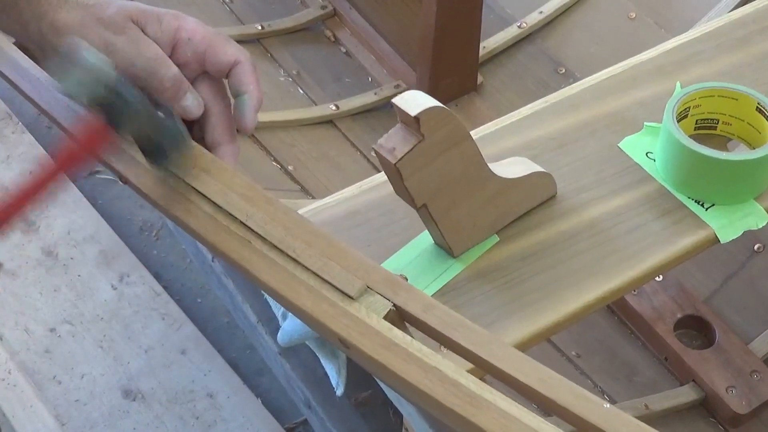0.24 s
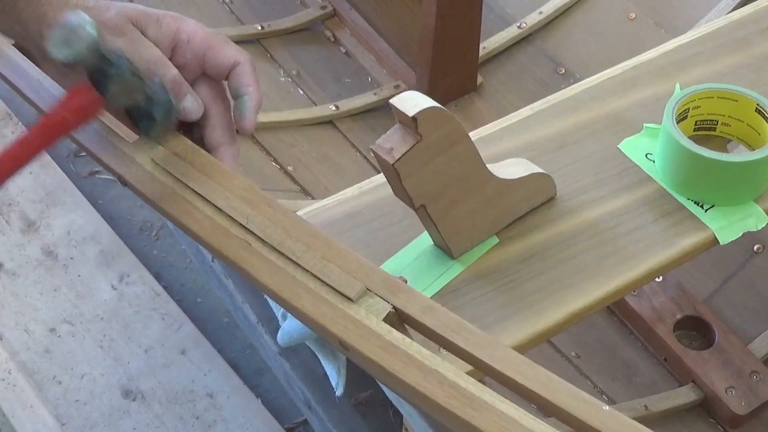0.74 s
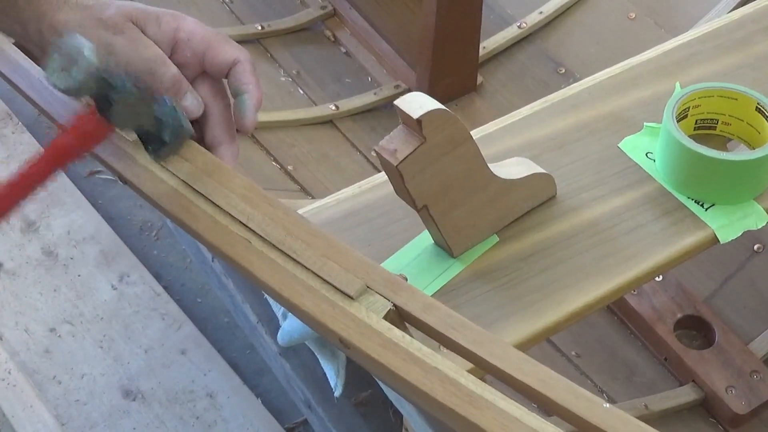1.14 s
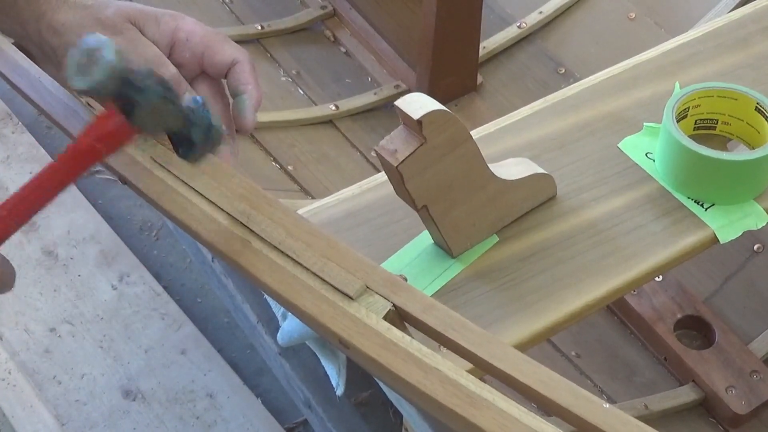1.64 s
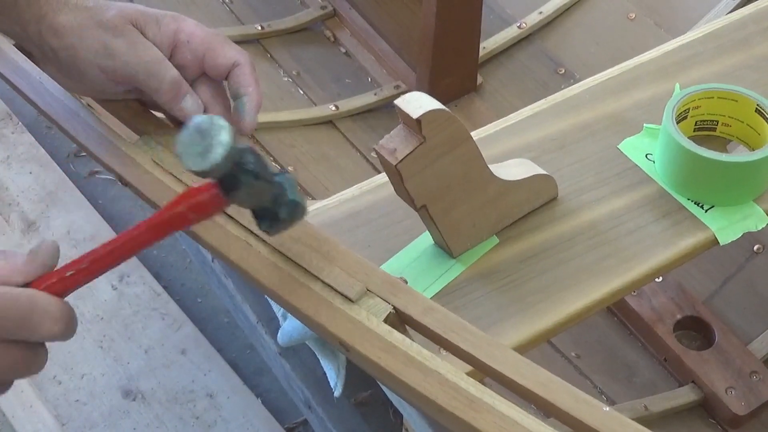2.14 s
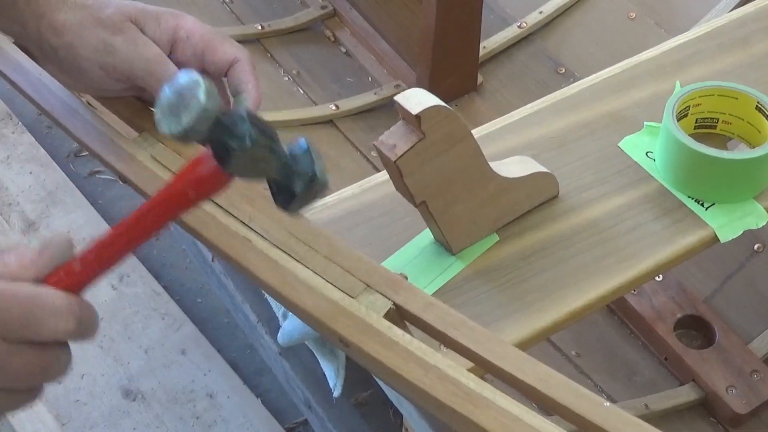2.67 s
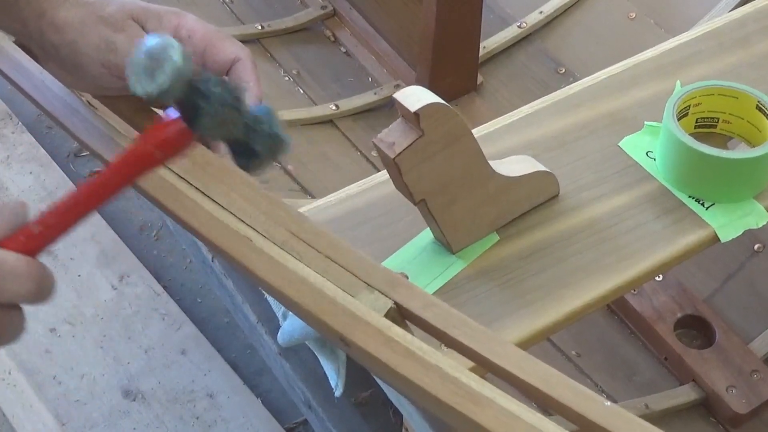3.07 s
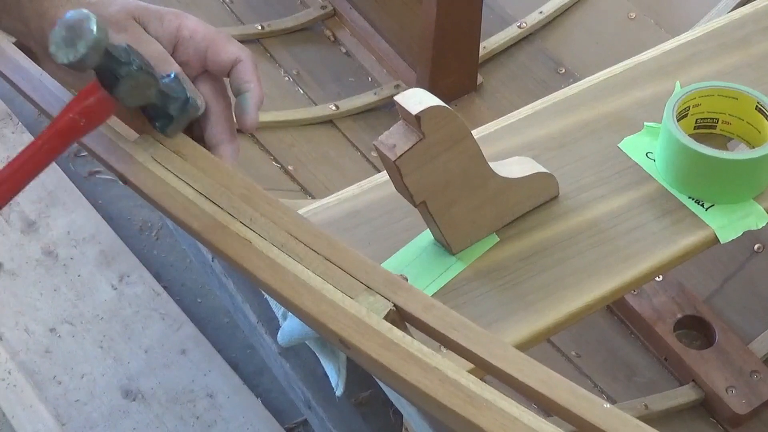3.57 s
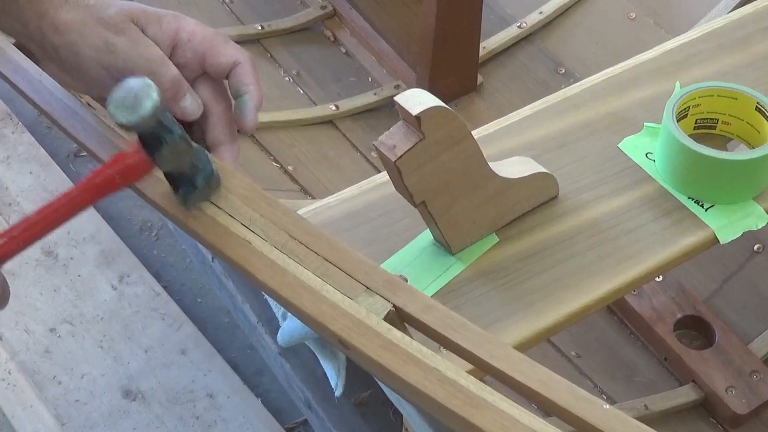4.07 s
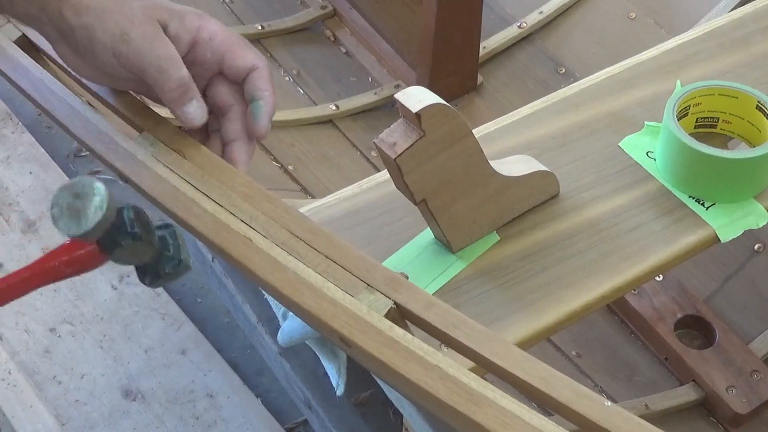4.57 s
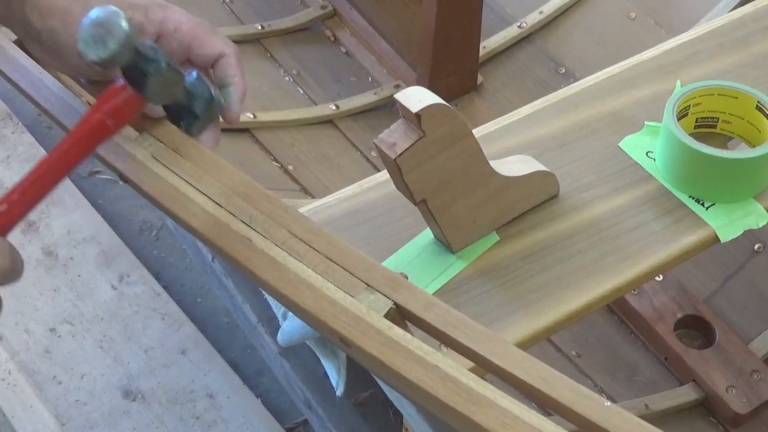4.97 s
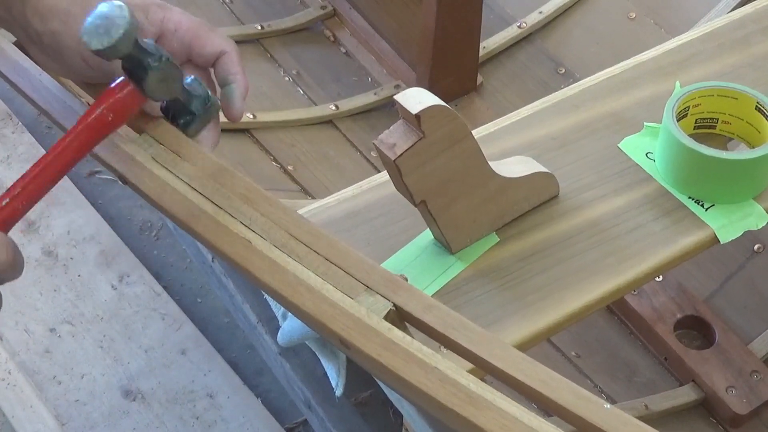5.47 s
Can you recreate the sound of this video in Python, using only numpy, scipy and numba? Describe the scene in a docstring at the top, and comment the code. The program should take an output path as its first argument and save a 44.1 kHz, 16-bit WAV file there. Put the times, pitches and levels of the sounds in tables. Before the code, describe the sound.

A steel hammer raps a wooden block on a boat rail about three times a second, each hard knock ringing through the hollow hull.

```python
"""In a boat workshop, a steel hammer taps a glued wooden block into the rail of a wooden boat.
Blows come about three a second, with a few pauses. Each is a short noise crack of steel on wood and a
woody tock of fading sines; the hull rings as longer sines and fading noise, for about half a second.
Blows differ in force, sharpness of contact, hollowness of the struck spot and looseness of the block.
Soft noise and a faint hum fill the pauses; the camera's limiter holds down the loud peaks."""
import sys
import numpy as np
from scipy import signal
from scipy.fft import rfft, irfft, next_fast_len
from scipy.io import wavfile
from scipy.ndimage import map_coordinates
from numba import njit

SR = 44100
rng = np.random.default_rng(int(sys.argv[2]) if len(sys.argv) > 2 else 0)


def store_pcm(level_fs):
    """Save levels as 16-bit WAV."""
    pcm = np.round(np.clip(level_fs, -1, 1) * 32767).astype(np.int16)
    wavfile.write(sys.argv[1], SR, np.atleast_2d(pcm).T)


N = 251811  # length in samples

# strongest resonances of the hull in the workshop:
# (frequency [Hz], relative level [dB], time to fade by 60 dB [s])
HULL_MODES = [(85, -21.5, 0.7), (99.4, -15.5, 0.41), (113.3, -13, 0.47), (134, -7, 0.35), (158.5, -2, 0.38),
              (170, -8.5, 0.42), (186.8, -6, 0.36), (197.5, -7.5, 0.45), (212, -3.0, 0.44),
              (243.9, -5.5, 0.42), (261.2, -6.5, 0.44), (282.3, -9, 0.45), (321.7, -0.5, 0.46),
              (330.7, -6, 0.36), (361, -8, 0.35), (386, -5.0, 0.39), (433.4, -3.5, 0.39),
              (480.6, -12.5, 0.31), (520, -9.5, 0.35), (555, -6.5, 0.22), (623, -5, 0.29), (677.3, -7, 0.3),
              (780, -6.5, 0.36), (882, -14.5, 0.4), (1052.3, -14, 0.38), (1227, -15.5, 0.25),
              (1352, -9.5, 0.22), (3027.6, -19.5, 0.37), (3316, -22.5, 0.37)]
# colour of the dense ring between those resonances: (frequency [Hz], relative level [dB per Hz])
RING_COLOUR = [(25, -34.5), (55, -29), (100, -11.5), (170, -0.5), (340, 0.5), (500, -1.5), (700, -3),
               (1050, -8), (1400, -8.5), (2200, -14.5), (4600, -20.5), (5900, -17), (7500, -25.5),
               (11000, -33), (13000, -70)]


def amp(db):
    """Turn decibels into a gain."""
    return 10 ** (np.asarray(db) / 20)


def unit(x):
    """Scale to an rms (average strength) of 1."""
    return x / np.sqrt(np.mean(x ** 2) + 1e-20)


def along(points, hz):
    """Read a curve of (frequency, value) points on a logarithmic frequency axis."""
    point_hz, value = np.transpose(points)
    return np.interp(np.log(hz + 1), np.log(point_hz + 1), value)


def filtered(x, response):
    """Multiply each frequency of x by the gain that response gives for it."""
    size = x.shape[-1]
    padded = next_fast_len(size + 4096)  # room for the filter's tail
    spectrum = rfft(x, padded) * response(np.fft.rfftfreq(padded, 1 / SR))
    return irfft(spectrum, padded)[..., :size]


def noise(colour, size):
    """Coloured stereo noise of rms 1: a part both microphones share, plus a weaker part that differs."""
    # the differing part against the shared one: (frequency [Hz], level [dB])
    side_level = [(30, -4.5), (120, -23.5), (500, -19.5), (2000, -16.5), (10000, -12.5)]
    mid, side = filtered(rng.standard_normal((2, size)), lambda hz: amp(along(colour, hz)))
    side = filtered(side, lambda hz: amp(along(side_level, hz)))
    return unit(np.array([mid + side, mid - side]))


def bell(hz, centre_hz, octaves):
    """A smooth hump of height 1 on a logarithmic frequency axis."""
    return np.exp(-.5 * (np.log2((hz + 1) / centre_hz) / octaves) ** 2)


def blow_colour(hz, sharpness, hollow_db, rattle_db):
    """A sharp contact trades thud for treble; a hollow spot adds knock, a loose block adds rattle."""
    contact_hz = 4650  # the treble tilts from about here upward
    treble = .5 * np.log2(1 + (hz / contact_hz) ** 2)
    # a dull contact pushes the planks longer: 0.22 dB of thud per dB/octave of dullness
    thud = 0.22 * bell(hz, centre_hz=350, octaves=0.48)
    knock = bell(hz, centre_hz=670, octaves=0.66)
    rattle = bell(hz, centre_hz=2930, octaves=0.54)
    return amp(sharpness * (treble - thud) + hollow_db * knock + rattle_db * rattle)


def crack_of_steel(t, crack_t60=0.0065, scatter_db=-13.0, scatter_t60=0.06):
    """The noise burst of steel on wood, then weaker scatter off the nearby boards (t60 in s)."""
    # colour of steel on wood: (frequency [Hz], relative level [dB per Hz])
    crack_colour = [(300, -22), (900, -4.5), (1600, 4.5), (3500, 3), (6200, 9), (8500, 4.5), (11000, -7.5),
                    (13000, -43)]
    crack_fade = amp(-60 * t / crack_t60)
    scatter_fade = amp(scatter_db - 60 * t / scatter_t60)
    return noise(crack_colour, len(t)) * (crack_fade + scatter_fade)


def block_tock(t, colour, scatter_db=2, detune=0.004, rise_s=0.0024):
    """Block and rail sound as brief sines; strength and pitch vary a little from blow to blow."""
    # resonances of block and rail, damped by glue and the steadying hand:
    # (frequency [Hz], relative level [dB], time to fade by 60 dB [s])
    block_modes = [(545, -2, 0.069), (787, -14.5, 0.015), (1410, -15, 0.15), (1578, -11.5, 0.22),
                   (1762, -5.5, 0.044), (1967, -11, 0.11), (2255, -4, .04), (6330, -4, 0.048)]
    hz, db, t60 = np.transpose(block_modes)[:, :, None]
    strength, shift, phase = rng.standard_normal((3, *hz.shape))
    level = colour(hz) * amp(db + scatter_db * strength - 60 * t / t60)
    wave = np.sin(2 * np.pi * (hz * (1 + detune * shift) * t + phase))
    # both microphones hear the block alike
    return np.sum(level * wave, axis=0) * (1 - np.exp(-t / rise_s))


def hull_resonances(t, phases, scatter_db=2.0, swell_s=0.012, apart_db=0.76):
    """Fading sines swell as the blow spreads through the planks; the two microphones hear them unequally."""
    hz, db, t60 = np.transpose(HULL_MODES)[:, :, None]
    level = amp(db + scatter_db * rng.standard_normal(hz.shape) - 60 * t / t60)
    wave = np.sin(2 * np.pi * hz * t + phases)
    pickup = amp(apart_db * rng.standard_normal((2, len(HULL_MODES))))
    return pickup @ (level * wave) * (1 - np.exp(-t / swell_s))


def die_away(x):
    """Let each frequency of the ring fade at its own speed."""
    # (frequency [Hz], time to fade by 60 dB [s])
    ring_t60 = [(80, 0.63), (220, 0.48), (600, 0.47), (1500, 0.42), (4000, 0.41), (7000, 0.36),
                (11000, 0.28)]
    hz, t, pieces = signal.stft(x, SR, nperseg=256)
    fade = amp(-60 * t / along(ring_t60, hz)[:, None])
    return signal.istft(pieces * fade, SR, nperseg=256)[1][:, :x.shape[-1]]


def dense_ring(t, usual, bass_hz=600, bass_swell_s=0.024, treble_swell_s=0.00044):
    """Fading noise for countless weak resonances and wall echoes, part repeated and part new each blow."""
    # how much of the ring's power is new at each blow: (frequency [Hz], share [0-1])
    renewed = [(200, .25), (900, 0.53), (2500, 0.6), (8000, 0.1)]
    fresh = filtered(noise(RING_COLOUR, len(t)), lambda hz: np.sqrt(along(renewed, hz)))
    repeated = filtered(usual, lambda hz: np.sqrt(1 - along(renewed, hz)))
    ring = die_away(fresh + repeated)
    bass = filtered(ring, lambda hz: 1 / (1 + (hz / bass_hz) ** 2))
    treble = ring - bass
    # the heavy planks take longer to get moving than the small block
    return bass * (1 - np.exp(-t / bass_swell_s)) + treble * (1 - np.exp(-t / treble_swell_s))


def striking_spot(hz, depth_db=1.0, spacing_hz=130):
    """Each spot favours some frequencies of the dense ring and misses others, more so higher up."""
    knots = rng.standard_normal(1024)
    ripple = map_coordinates(knots, [hz / spacing_hz], mode="mirror")  # a smooth random curve
    return depth_db * hz / (hz + 600) * ripple


def add(out, start_s, x):
    """Mix x into out from start_s on; what falls outside is dropped."""
    start = round(start_s * SR)
    x = x[:, max(-start, 0):N - start]
    out[:, max(start, 0):][:, :x.shape[1]] += x


def hammer(modes_db=-9.5, ring_db=-7.0, block_db=-10.0):
    """Every blow drives the same hull; its force and the way it lands set its level and colour."""
    # (time [s], force [dB], sharpness of contact [dB per octave], hollowness of the spot [dB],
    #  rattle of the block in its gap [dB])
    blows = [(-.045, 0.8, 1, -1, 1.5), (0.2977, 3, 6, 3, 7), (0.639, 1.3, 4, 2.5, 7),
             (0.9633, 1.9, 5, -1, 1), (1.2272, 4, -18.5, -6, -5), (1.4925, 3.4, -9.5, -6, -2.5),
             (1.787, 0.1, -3.5, -2.5, 4), (2.1048, 3, 5, -3.5, 0), (2.4441, 4.5, -4, 5, 0.5),
             (2.8095, 1.9, 1, 7.5, 1), (3.3426, 3, 6, 0, 0), (3.7219, -2.2, -7.5, 4.5, -3.5),
             (3.9392, -2.3, -14.5, 4, 4.5), (4.1096, -4, -18.5, 7.5, 4.5), (5.091, 6, -6, -8.5, -3.5),
             (5.3744, 4, -7, -9, -7.5), (5.6251, 3.5, -7.5, -8, -5.5)]
    crack_share = 0.86  # part of the sharpness that colours the crack
    tock_per_solidity = 0.36  # the block tocks most on a solid spot: dB gained per dB less hollowness
    brief = np.arange(round(0.12 * SR)) / SR  # time in the crack and tock
    t = np.arange(round(0.7 * SR)) / SR  # time in the ring
    out = np.zeros((2, N))
    phases = rng.uniform(0, 2 * np.pi, (len(HULL_MODES), 1))
    usual = noise(RING_COLOUR, len(t))
    for start_s, force_db, sharpness, hollow_db, rattle_db in blows:
        colour = lambda hz: blow_colour(hz, sharpness, hollow_db, rattle_db)
        crack_tint = lambda hz: blow_colour(hz, crack_share * sharpness, hollow_db, rattle_db)
        crack = filtered(crack_of_steel(brief), crack_tint)
        tock = amp(block_db - tock_per_solidity * hollow_db) * block_tock(brief, colour)
        modes = amp(modes_db) * hull_resonances(t, phases)
        wash = filtered(dense_ring(t, usual), lambda hz: amp(striking_spot(hz)))
        ring = filtered(modes + amp(ring_db) * wash, colour)
        add(out, start_s, amp(force_db) * (crack + tock))
        add(out, start_s, amp(force_db) * ring)
    return out


def workshop(air_db=-57, lean_db=1.1):
    """Still air as steady noise and a distant machine as steady sines, a little to the left."""
    # colour of the air: (frequency [Hz], relative level [dB per Hz])
    air_colour = [(18, -67), (30, -32.5), (50, -20), (63, -1.5), (120, -14.5), (160, -7.5), (270, -12.5),
                  (1490, -19.5), (1770, -20), (1950, -23.5), (3530, -28), (6230, -29.5), (11000, -42),
                  (14300, -65.5), (22000, -120)]
    # tones of the distant machine, before the lean to the left: (frequency [Hz], rms level [dB])
    hum_tones = [(66, -69.5), (157, -66.5), (210, -66.5), (1776, -74.5)]
    t = np.arange(N) / SR
    hum = np.zeros(N)
    for hz, db in hum_tones:
        hum += amp(db) * np.sqrt(2) * np.sin(2 * np.pi * (hz * t + rng.random()))
    air = amp(air_db) * noise(air_colour, N)
    return (air + hum) * amp([[lean_db / 2], [-lean_db / 2]])


def scene():
    """Mix hammer and workshop; the bass of the whole lies a little to the left."""
    # (frequency [Hz], left minus right [dB])
    left_lean = [(100, 2.5), (250, 1.3), (600, 0.5), (2000, 0), (10000, 0)]
    mix = hammer() + workshop()
    return filtered(mix, lambda hz: amp(np.outer([.5, -.5], along(left_lean, hz))))


@njit
def follow(x, attack, release):
    """Follow a level up and down with two time constants, in samples."""
    out = np.empty_like(x)
    level = 0.
    for i in range(len(x)):
        level += (x[i] - level) / (attack if x[i] > level else release)
        out[i] = level
    return out


def limiter(x, ceiling_db=-3.5, attack_s=0.000067, release_s=0.013, linger=0.2, recovery_s=0.79):
    """Pull peaks down almost at once; most of the gain returns quickly, a part of it slowly."""
    peak = follow(np.abs(x).max(axis=0), attack_s * SR, release_s * SR)
    over_db = np.maximum(20 * np.log10(peak + 1e-9) - ceiling_db, 0)
    # linger is the share of the cut that returns slowly
    held_db = follow(over_db * linger, release_s * SR / 10, recovery_s * SR)
    return x * amp(-np.maximum(over_db, held_db))


def record(dry, clip_db=-2.5, hardness=5, top_hz=11200):
    """The camera limits, rounds off what slips past, and keeps nothing above its band limit."""
    x = limiter(dry)
    rounded = x / (1 + np.abs(x / amp(clip_db)) ** hardness) ** (1 / hardness)
    return filtered(rounded, lambda hz: hz < top_hz)


dry = scene()
out = record(dry)
store_pcm(out)
```